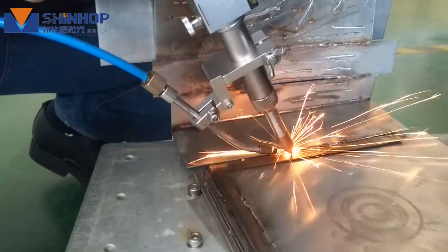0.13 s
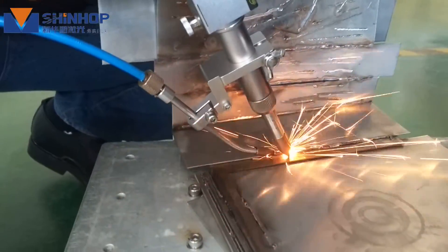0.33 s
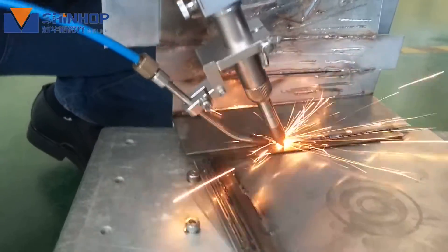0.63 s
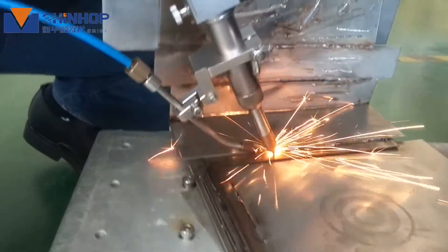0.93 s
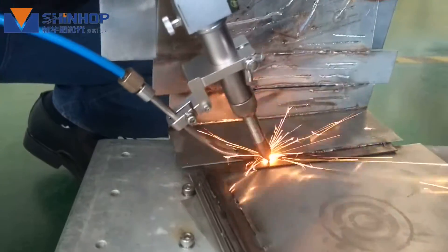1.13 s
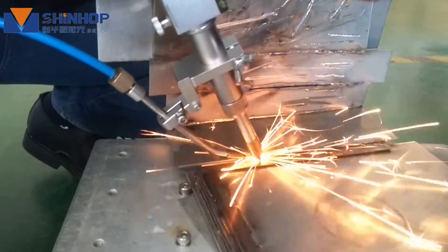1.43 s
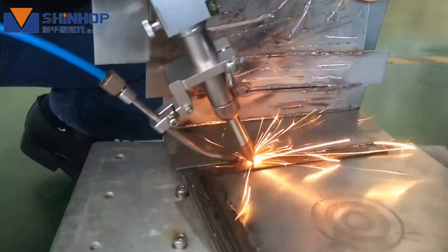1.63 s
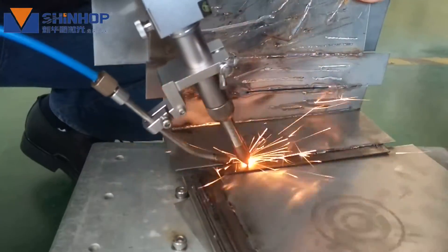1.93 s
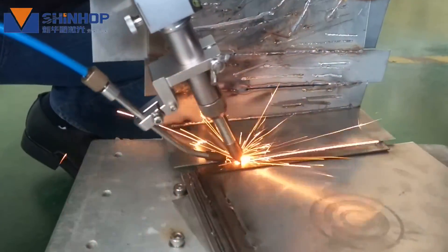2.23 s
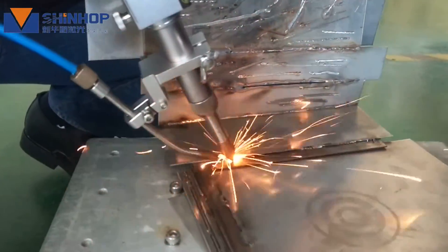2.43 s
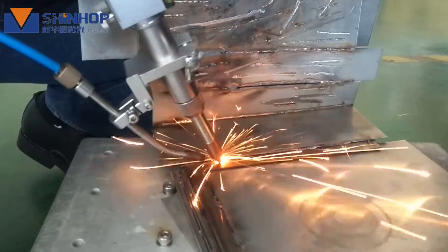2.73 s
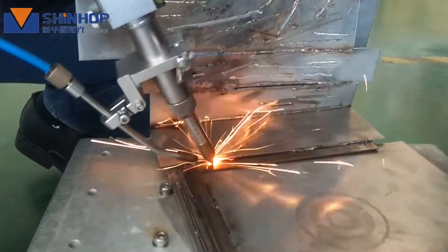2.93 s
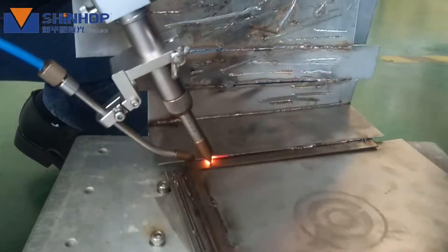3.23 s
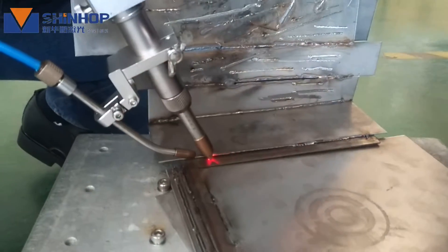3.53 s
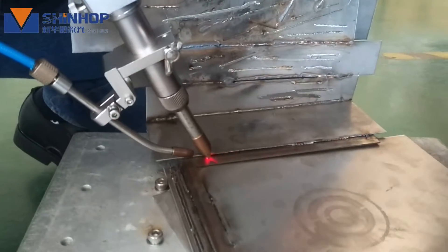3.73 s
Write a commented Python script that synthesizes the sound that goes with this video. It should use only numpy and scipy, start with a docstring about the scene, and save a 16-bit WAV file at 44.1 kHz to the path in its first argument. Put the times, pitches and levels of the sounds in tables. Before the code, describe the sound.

Bright buzzing weld sizzle and whistling gas hiss over machine hum, ending with a knock and puff

```python
"""Handheld laser welding on steel

Shaped noise: the melt pool sizzles in 50 surges a second with random sparks; shield gas hisses and rings
nozzle resonances. Steel plates and bench reflect both. The beam stops, the trigger knocks, then the gas
valve shuts with a dull puff and the hose empties. Sine hum and fan noise run throughout, with soft
handling bumps and a faint drone that dies away partway."""
import sys
import numpy as np
from scipy import signal
from scipy.fft import rfft, irfft
from scipy.io import wavfile
from scipy.ndimage import uniform_filter1d, map_coordinates

SR = 44100
rng = np.random.default_rng(int(sys.argv[2]) if len(sys.argv) > 2 else 0)


def dump_mix(stems):
    """Bounce the given channels to the path in sys.argv[1] as a 16-bit WAV at rate SR."""
    frames = np.atleast_2d(stems).T  # one column per channel
    limited = np.clip(frames, -1, 1)  # hard clip at full scale
    pcm = np.round(limited * 32767).astype(np.int16)
    wavfile.write(sys.argv[1], SR, pcm)


N = 170667


def amp(db):
    """Decibels to gain."""
    return 10 ** (np.asarray(db) / 20)


def unit(x):
    """Scale to rms 1."""
    return x / np.sqrt(np.mean(x ** 2) + 1e-20)


def times():
    """Time of every sample [s]."""
    return np.arange(N) / SR


def curve(table, axis=1):
    """One table column, interpolated linearly in time."""
    rows = np.array(table)
    return np.interp(times(), rows[:, 0], rows[:, axis])


def noise():
    """White noise, rms 1."""
    return rng.standard_normal(N)


def walk(rate_hz):
    """Slow random drift, rms 1: noise smoothed twice over 1 / rate_hz."""
    k = max(int(SR / rate_hz), 2)
    once = uniform_filter1d(noise(), k, mode="wrap")
    return unit(uniform_filter1d(once, k, mode="wrap"))


def colour(x, points):
    """Filter by (frequency [Hz], level [dB]) points on a log-frequency axis; rms 1."""
    hz, db = np.array(points).T
    f = np.fft.rfftfreq(N, 1 / SR) + 1  # +1 avoids log(0)
    gain = amp(np.interp(np.log(f), np.log(hz), db))
    return unit(irfft(rfft(x) * gain, N))


def ring(x, hz, width_hz):
    """Resonance of two cascaded one-pole-pair bandpasses; rms 1."""
    f = np.fft.rfftfreq(N, 1 / SR) + 1
    detuning = (f / hz - hz / f) * hz / width_hz
    return unit(irfft(rfft(x) / (1 + .5j * detuning * np.sqrt(2)) ** 2, N))


def swell(at_s, sigma_s):
    """Gaussian rise and fall, peak 1."""
    return np.exp(-.5 * ((times() - at_s) / sigma_s) ** 2)


def fade(at_s, db_per_s):
    """Gain 1 until at_s, then exponential decay."""
    return amp(-db_per_s * np.maximum(times() - at_s, 0))


TONE_WAVER_DB = 0.22


def tone(hz, db):
    """Sine of rms level db, random phase, slightly wavering level."""
    level = amp(db + TONE_WAVER_DB * walk(4.7))
    return np.sqrt(2) * level * np.sin(2 * np.pi * (hz * times() + rng.random()))


BEAM_OFF_S, BEAM_FADE_DB_PER_S = 3.212, 368
SURGE_HZ, SURGE_PEAK_S, SURGE_FLOOR = 50, .009, 0.31
SURGE_TIP, SURGE_TIP_ORDER = 0.14, 27  # height and narrowness of the sharper crest
SURGE_SCATTER_DB, BOIL_DB = .5, 0.9
SPARKS_PER_S, SPARK_SPREAD_DB, SPARK_DB = 900, 3, -13.5  # SPARK_DB: re vapour noise
# sizzle strength: (time [s], level [dB])
SIZZLE_LEVEL = [(0, -29.5), (.55, -29), (.8, -25), (.98, -25.5), (1.08, -30), (1.6, -29.5), (2.3, -29),
                (2.9, -28.5), (3.15, -28.5)]
# sizzle spectrum: (frequency [Hz], level at seam start [dB], level at seam end [dB])
SIZZLE_COLOUR = [(1450, -20.5, -21), (2520, -23, -13), (3620, -15, -5.5), (4450, -4, -10.5),
                 (5000, -15.5, -5.5), (5900, -5.5, 0), (6440, 3, 2), (7200, 3.5, 10.5), (7350, -11.5, -2),
                 (8000, -2, -10), (8500, -7, -8.5), (9130, -8, -9.5), (9500, 3, 0.5), (9900, -6.5, -1.5),
                 (10400, 1.5, 4), (10900, -6, -1.5), (11150, -1, 1.5), (11500, -6.5, -6), (11800, 4, -8),
                 (12000, -8, -9), (12300, -4, -6), (12400, -16, -19), (13050, -2.5, -2), (14000, 6, 3.5),
                 (14430, -1, 4), (14750, -6, -16), (15150, -3, -11), (15500, -1.5, -0.5)]


def melt_pool():
    """Vapour leaves the pool in regular surges, boiling unevenly and spitting tiny sparks."""
    cycle = np.abs(np.cos(np.pi * SURGE_HZ * (times() - SURGE_PEAK_S)))
    shape = SURGE_FLOOR + (1 - SURGE_FLOOR) * cycle + SURGE_TIP * cycle ** SURGE_TIP_ORDER
    surge = unit(shape) * amp(SURGE_SCATTER_DB * walk(60) + BOIL_DB * walk(700))

    spark_hits = rng.random(N) < SPARKS_PER_S / SR
    spark_sizes = amp(SPARK_SPREAD_DB * np.minimum(rng.exponential(size=N), 4))
    sparks = spark_hits * np.sign(noise()) * spark_sizes
    vapour = (noise() + amp(SPARK_DB) * unit(sparks)) * surge

    # spectrum shifts as the torch travels
    hz, start_db, end_db = np.array(SIZZLE_COLOUR).T
    along = np.minimum(times() / BEAM_OFF_S, 1)
    along = along * along * (3 - 2 * along)  # smoothstep
    start = colour(vapour, np.c_[hz, start_db])
    end = colour(vapour, np.c_[hz, end_db])
    sizzle = (1 - along) * start + along * end
    return sizzle * amp(curve(SIZZLE_LEVEL)) * fade(BEAM_OFF_S, BEAM_FADE_DB_PER_S)


VALVE_SHUT_S, GAS_FADE_DB_PER_S = 3.564, 65
JET_DB, WEAK_RINGS_DB = -39, -42.5  # before JET_FLOW
GAS_FLUTTER_DB = 0.58
# jet spectrum: (frequency [Hz], level [dB])
JET_COLOUR = [(400, -29), (750, -10), (1150, -3.5), (1500, -7.5), (2000, -5.5), (2300, 0), (2500, -16),
              (2750, -12), (3250, -3), (3550, -7.5), (4100, -6.5), (5000, -2.5), (6100, -10), (6600, 10),
              (7100, 7.5), (7600, -17), (7950, -29), (8600, -28), (9500, -14), (10500, -18), (11400, -25),
              (12300, -35), (13300, -18), (14500, -26), (15500, -24)]
# weak nozzle resonances: (frequency [Hz], width [Hz], relative level [dB])
WEAK_RINGS = [(4045, 190, -3.5), (4615, 95, -8.5), (5477, 123, 0.5), (5930, 90, -5), (9050, 110, -11.5),
              (9800, 200, -11), (11200, 160, -22), (13150, 240, -19), (15200, 220, -26)]
# strength of jet and weak resonances: (time [s], level [dB])
JET_FLOW = [(0, 2), (.6, 2.5), (.85, 2), (1.1, -4), (1.6, -0.5), (2.2, 1), (2.9, 2), (3.28, 3), (3.52, 5),
            (3.65, 5.5)]
# strong nozzle resonances, broad low, narrow low, middle, high: frequency [Hz]
STRONG_RING_HZ = [2900, 3040, 6400, 7370]
# same resonances: width [Hz]
STRONG_RING_WIDTH_HZ = [378, 120, 130, 238]
# their levels as the torch moves:
# (time [s], broad low [dB], narrow low [dB], middle [dB], high [dB])
STRONG_RING_LEVELS = [(0, -36, -41, -35.5, -43), (.25, -35.5, -40.5, -34, -50), (.65, -36.5, -44, -35, -51),
                      (1.0, -42, -53, -34.5, -49), (1.15, -43, -44.5, -37.5, -47),
                      (1.7, -44, -41, -38, -43.5), (2.3, -44.5, -43.5, -38, -38.5),
                      (2.5, -48, -41, -46, -41), (2.85, -46, -36.5, -47, -33),
                      (3.25, -46, -38.5, -46, -36.5), (3.48, -38, -34.5, -40, -34.5),
                      (3.6, -40.5, -42.5, -41, -36.5)]


def gas():
    """Turbulent jet noise excites the nozzle cavities; decays as the hose empties."""
    jet = amp(JET_DB) * colour(noise(), JET_COLOUR)
    weak = sum(amp(db) * ring(noise(), hz, width_hz) for hz, width_hz, db in WEAK_RINGS)
    out = (jet + amp(WEAK_RINGS_DB) * unit(weak)) * amp(curve(JET_FLOW))
    for k, (hz, width_hz) in enumerate(zip(STRONG_RING_HZ, STRONG_RING_WIDTH_HZ)):
        level = amp(curve(STRONG_RING_LEVELS, axis=k + 1))
        out = out + ring(noise(), hz, width_hz) * level
    flutter = amp(GAS_FLUTTER_DB * walk(21))
    return out * flutter * fade(VALVE_SHUT_S, GAS_FADE_DB_PER_S)


PUFF_S, PUFF_SIGMA_S, PUFF_HZ, PUFF_WIDTH_HZ, PUFF_DB = 3.594, 0.11, 1590, 2200, -42


def puff():
    """The shutting valve lets out a dull rush: broad resonant noise, treble cut."""
    rush = colour(ring(noise(), PUFF_HZ, PUFF_WIDTH_HZ), [(5000, 0), (9000, -25)])
    return amp(PUFF_DB) * swell(PUFF_S, PUFF_SIGMA_S) * rush


BENCH_DB, BENCH_DECAY_S = -12, 0.0063
# plate reflections: (delay at start [ms], delay at end [ms])
PLATE_DELAYS_MS = [(.98, .976), (1.228, 1.128), (1.36, 1.372), (2.096, 2.132), (3.008, 3.148)]
# gain of each reflection [linear]
REFLECTION_GAINS = [-0.0062, 0.11, 0.056, 0.0064, 0.084]


def plates(x):
    """Steel mirrors the sound along paths that drift with the torch; the bench scatters a short tail."""
    n = np.arange(N)
    mirrored = 0
    for (first_ms, last_ms), gain in zip(PLATE_DELAYS_MS, REFLECTION_GAINS):
        delay_samples = np.linspace(first_ms, last_ms, N) * SR / 1000
        mirrored = mirrored + gain * map_coordinates(x, [n - delay_samples], mode="mirror")
    decay = np.exp(-times() / BENCH_DECAY_S)
    tail = noise() * decay * (1 - decay)
    scattered = signal.fftconvolve(x, tail / np.linalg.norm(tail))[:N]
    return x + mirrored + amp(BENCH_DB) * scattered


KNOCK_S, KNOCK_ATTACK_S, KNOCK_DECAY_DB_PER_S = 3.455, 0.0016, 170
KNOCK_HZ, KNOCK_WIDTH_HZ, KNOCK_DB = 446, 500, -39


def knock():
    """The released trigger knocks dully: low resonant noise, fast attack, short decay."""
    attack = np.clip((times() - KNOCK_S) / KNOCK_ATTACK_S, 0, 1)
    envelope = attack * fade(KNOCK_S, KNOCK_DECAY_DB_PER_S)
    return amp(KNOCK_DB) * ring(noise(), KNOCK_HZ, KNOCK_WIDTH_HZ) * envelope


# handling bumps: (time [s], sigma [s], frequency [Hz], width [Hz], level [dB])
HANDLING_BUMPS = [(0.372, 0.034, 159, 49, -42.5), (1.8, .08, 57, 10, -58), (2.6, 0.092, 60, 8.9, -50),
                  (2.88, .07, 157, 35, -45), (3.7, 0.26, 146, 86, -48)]


def handling():
    """Soft low bumps: resonant noise under Gaussian swells."""
    return sum(amp(db) * swell(at_s, sigma_s) * ring(noise(), hz, width_hz)
               for at_s, sigma_s, hz, width_hz, db in HANDLING_BUMPS)


MAINS_HZ, FAN_AIR_DB = 50.04, -46
FAN_SHARE = 0.29  # fan's share of the MACHINE_LEVEL change in dB
DRONE_HZ, DRONE_DB, DRONE_END_S, DRONE_FADE_DB_PER_S = 62.5, -59.5, 1.8, 90
# hum, before MACHINE_LEVEL: (multiple of mains [1], level [dB])
HUM_HARMONICS = [(2, -40.5), (4, -53), (8, -58.5), (12, -65), (14, -60.5)]
# sixth mains multiple, moving on its own: (time [s], level [dB])
SIXTH_LEVEL = [(0, -50.5), (.8, -48.5), (1.1, -54), (1.3, -51.5), (2.105, -51), (2.7, -54.5), (3.0, -54.5),
               (3.15, -52), (3.3, -52), (3.5, -45), (3.87, -47)]
# fan tones: (frequency [Hz], level [dB])
FAN_WHINE = [(861, -59)]
# fan air spectrum: (frequency [Hz], level [dB])
FAN_AIR_COLOUR = [(25, -18), (45, -15), (65, -7), (90, -1.5), (150, 0), (230, -8), (340, -10.5), (480, -7),
                  (620, -1), (850, 0.5), (1200, -1.5), (1500, -12), (2500, -14.5), (6000, -20), (9000, -45),
                  (15000, -55)]
# level change of hum and fan: (time [s], level [dB])
MACHINE_LEVEL = [(0, -0.5), (.7, 0.9), (.88, -1.3), (1.08, -4.5), (1.7, -1.9), (2.2, 0), (2.7, -0.5),
                 (3.1, 0.5), (3.35, 0.5), (3.55, 5.5), (3.87, 4.5)]


def machine():
    """Mains harmonics hum, the fan adds a tone over rushing air, and a low drone dies away."""
    level_db = curve(MACHINE_LEVEL)
    hum = sum(tone(k * MAINS_HZ, db + level_db) for k, db in HUM_HARMONICS)
    sixth = tone(6 * MAINS_HZ, curve(SIXTH_LEVEL))
    whine = sum(tone(hz, db) for hz, db in FAN_WHINE)
    fan = whine + amp(FAN_AIR_DB) * colour(noise(), FAN_AIR_COLOUR)
    drone = tone(DRONE_HZ, DRONE_DB) * fade(DRONE_END_S, DRONE_FADE_DB_PER_S)
    return hum + sixth + fan * amp(FAN_SHARE * level_db) + drone


def scene():
    """Torch with reflections, plus knock, bumps and machine; one channel."""
    torch = plates(melt_pool() + gas() + puff())
    return (torch + knock() + handling() + machine())[None]


TOP_HZ = 15480


def record(dry):
    """Steep elliptic low-pass at TOP_HZ: order 12, 0.2 dB ripple, 80 dB stopband."""
    low_pass = signal.ellip(12, .2, 80, TOP_HZ, fs=SR, output="sos")
    return signal.sosfilt(low_pass, dry)


dry = scene()
out = record(dry)
dump_mix(out)
```